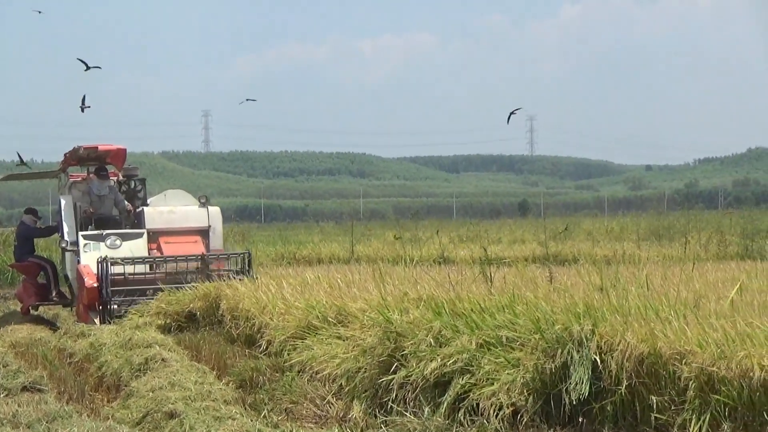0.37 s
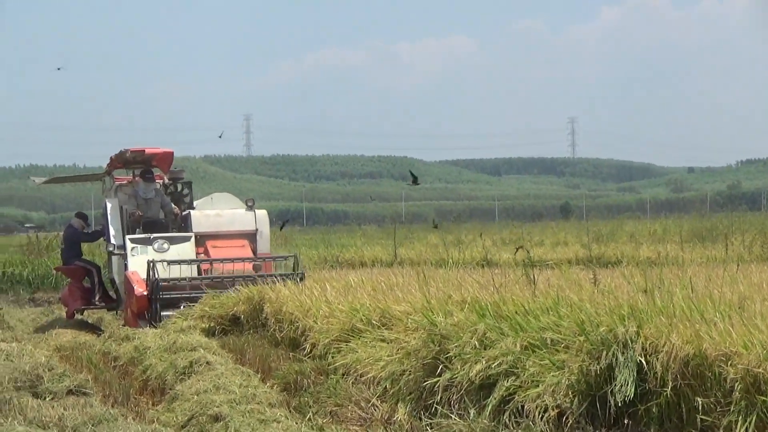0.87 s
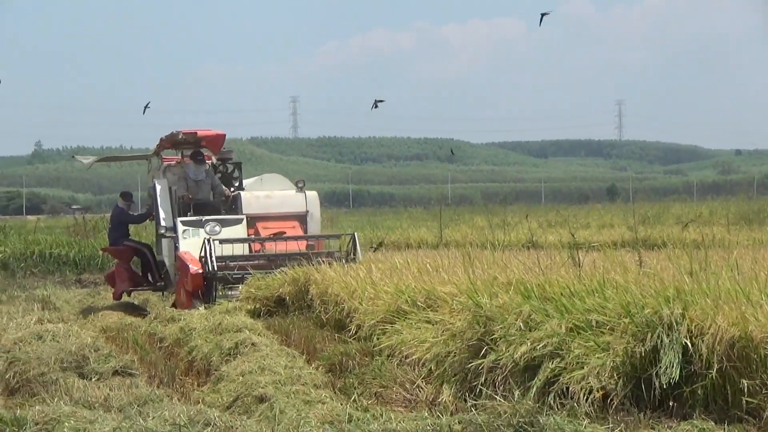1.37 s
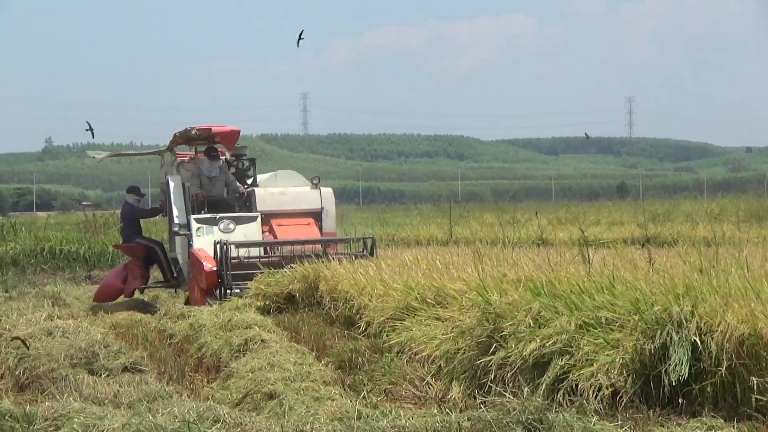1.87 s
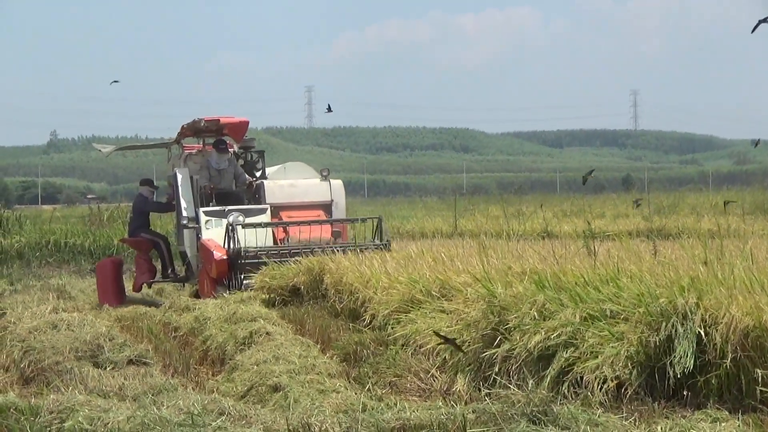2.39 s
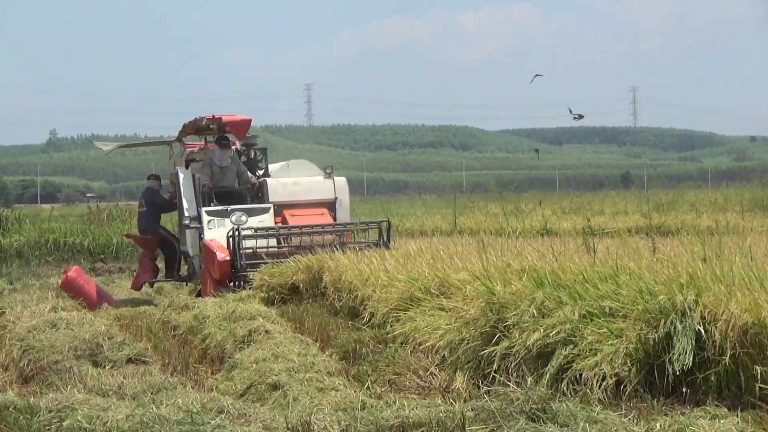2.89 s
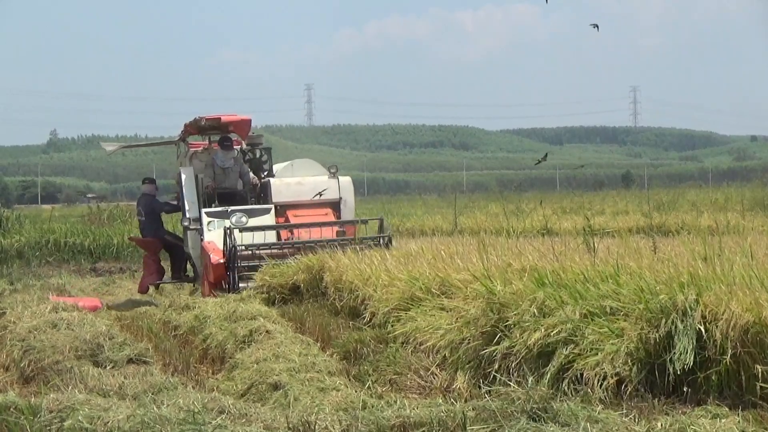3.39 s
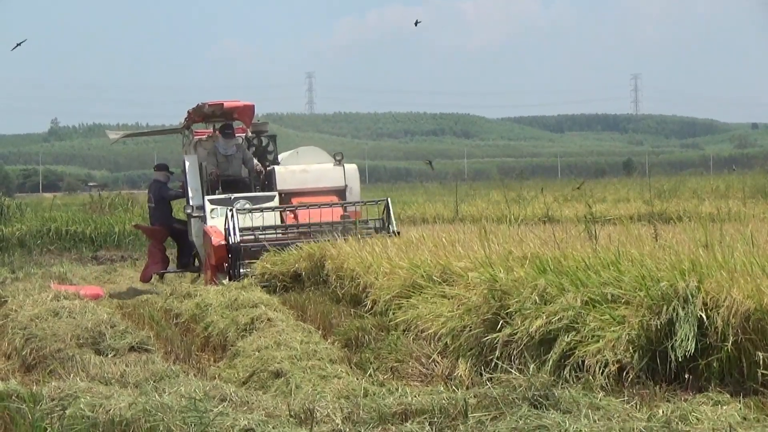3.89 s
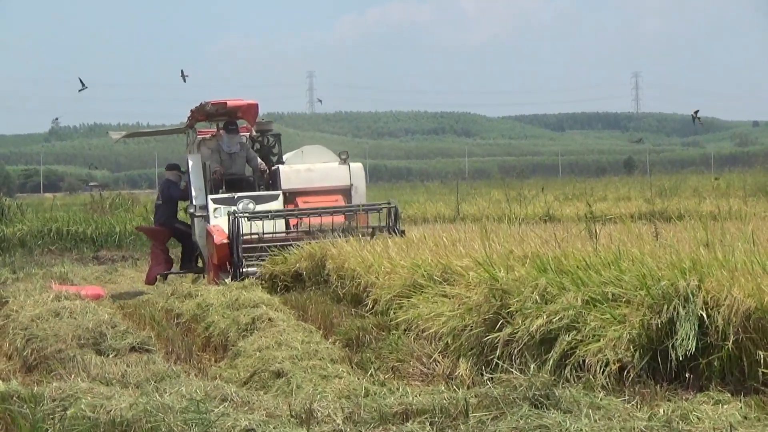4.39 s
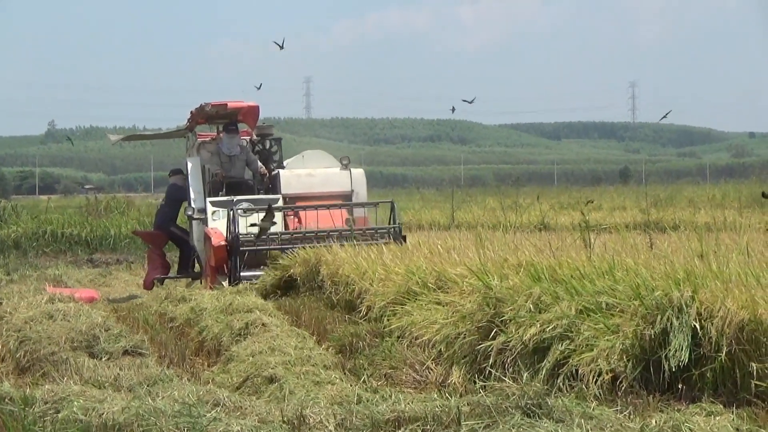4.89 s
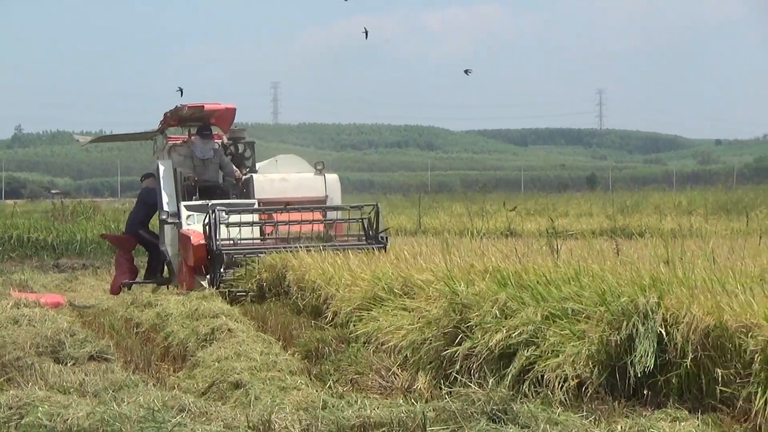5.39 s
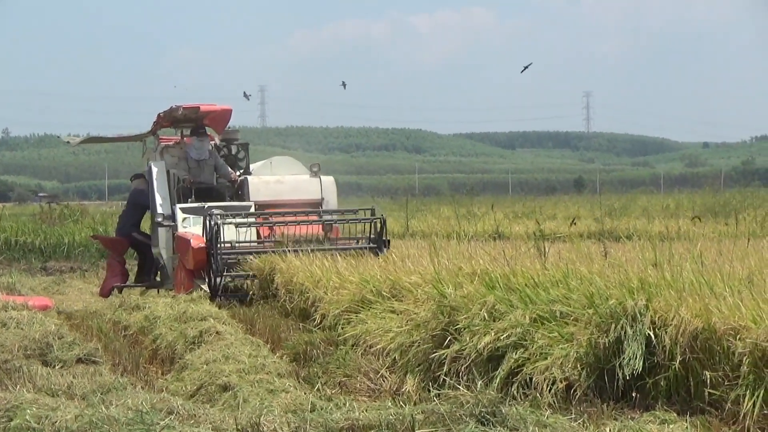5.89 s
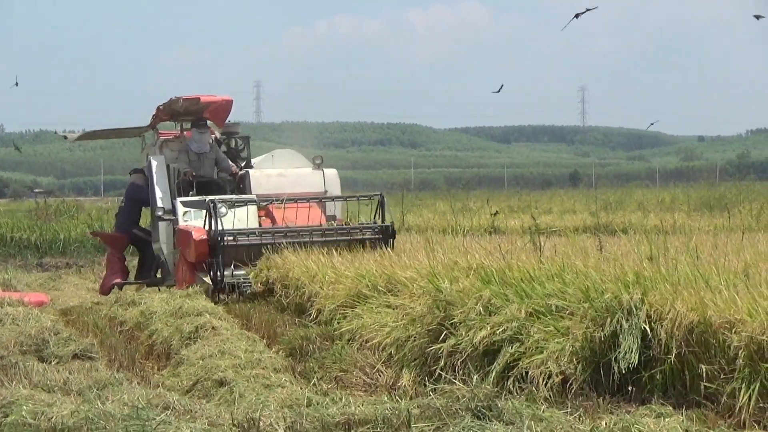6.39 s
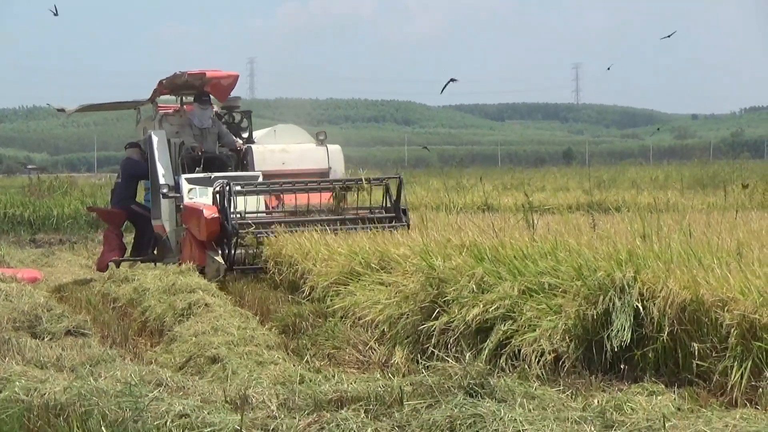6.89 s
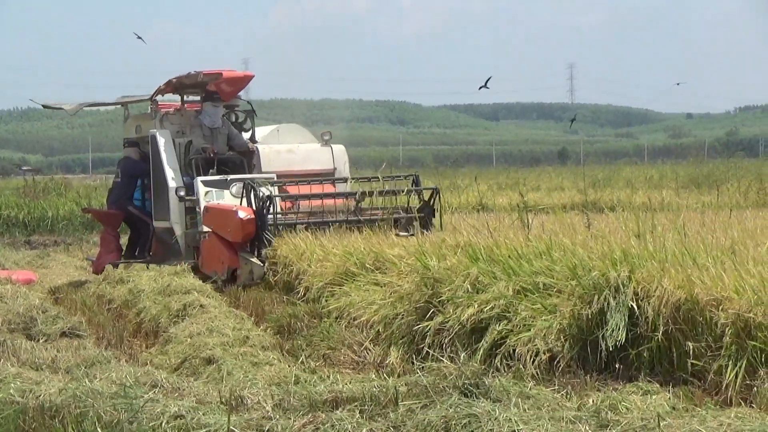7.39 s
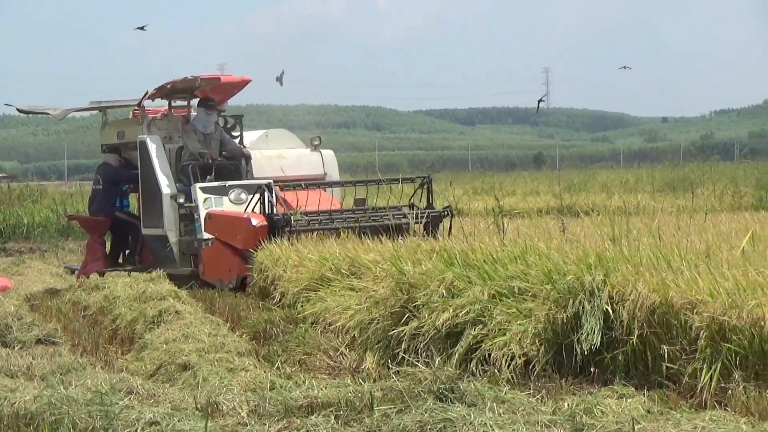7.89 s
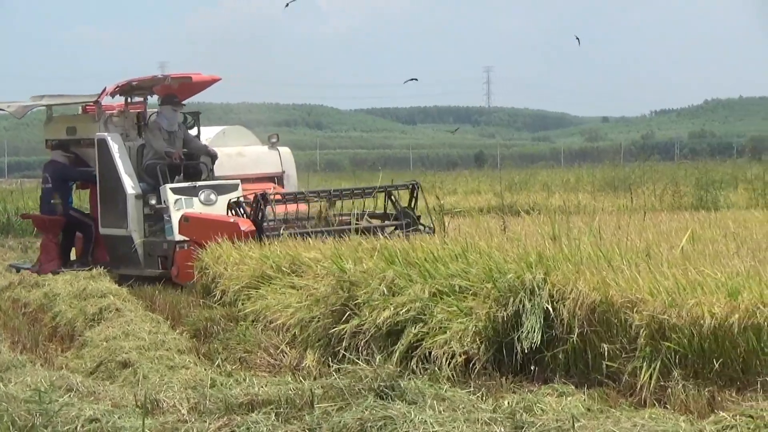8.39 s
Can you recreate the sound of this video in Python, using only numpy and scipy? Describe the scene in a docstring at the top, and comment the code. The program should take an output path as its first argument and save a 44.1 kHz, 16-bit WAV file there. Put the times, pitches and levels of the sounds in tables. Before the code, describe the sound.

Continuous outdoor harvesting noise: rattling drum and panels, rough roar, straw swishing through the cutter, and a soft low engine hum. The machine is loudest in the midrange, uneven as wads of straw pass, and gradually gains level. Brief hard knocks and muffled thuds break the texture. Low wind flutter strikes the exposed microphone lightly at first, then heavily on the right halfway through, over quiet recorder hiss.

```python
"""Combine harvester across a rice field

A combine harvester cuts rice some way off across an open field and slowly comes nearer. The engine hums in
tones on its firing rate; drum and panels clatter and the cutter bar rustles through the straw, as noise and
ringing ticks that two microphone ports colour unequally. Wind puffs hit the ports as shaped noise and short
pulses, over the recorder's hiss and a thin steady whine high in the treble."""
import sys
import numpy as np
from scipy import signal
from scipy.fft import rfft, irfft, next_fast_len
from scipy.io import wavfile
from scipy.ndimage import uniform_filter1d, map_coordinates

SR = 44100
rng = np.random.default_rng(int(sys.argv[2]) if len(sys.argv) > 2 else 0)


def amplitude_ratio(level_db):
    """Convert a level in decibels to the matching linear amplitude (field) ratio."""
    exponent = np.asarray(level_db, float) / 20
    return 10 ** exponent


def master(y):
    """Save y as 16-bit WAV."""
    cut = np.clip(np.atleast_2d(y).T, -1, 1)
    pcm = np.round(cut * 32767)  # scale
    wavfile.write(sys.argv[1], SR, pcm.astype(np.int16))


N = 375732  # length [samples]


def unit(x):
    """Scale to rms 1."""
    return x / np.sqrt(np.mean(x ** 2) + 1e-20)


def along(points, hz):
    """Read (frequency, value) points on a log frequency axis."""
    f, v = np.transpose(points)
    return np.interp(np.log(hz + 1), np.log(f + 1), v)


def curve(points):
    """Join (time, value) points into one value per sample."""
    s, v = np.transpose(points)
    return np.interp(np.arange(N) / SR, s, v)


def swells(times, half_s, *rises):
    """Sum bell-shaped rises in dB; one curve for each column of rises."""
    coarse_s = np.arange(0, N, 32) / SR
    bell = np.exp(-((coarse_s - times[:, None]) / np.reshape(half_s, (-1, 1))) ** 2)
    return [np.repeat(r @ bell, 32)[:N] for r in rises]


def wobble(rate):
    """A smooth random curve through rate knots a second."""
    knots = rng.standard_normal(int(N * rate / SR) + 4)
    return map_coordinates(knots, [np.arange(N) * rate / SR])


def filtered(x, response):
    """Shape the spectrum of x by a complex response of frequency."""
    m = next_fast_len(N + 8192)
    return irfft(rfft(x, m) * response(np.fft.rfftfreq(m, 1 / SR)), m)[..., :N]


def patchy(depth_db):
    """Two white noises that share drifting patches of gain, as turbulent air gives a far source."""
    z = signal.stft(rng.standard_normal((2, N)), nperseg=512)[2]
    field = uniform_filter1d(rng.standard_normal(z.shape[1:]), size=5, axis=0)
    field = uniform_filter1d(field, size=10, axis=1)
    return signal.istft(z * amplitude_ratio(depth_db * unit(field)), nperseg=512)[1][:, :N]


# tone of the recorder's hiss before levelling: (frequency [Hz], relative level [dB per Hz])
HISS_COLOUR = [(300, -2), (3000, -9), (9000, 0.5), (15500, 1.5)]


def recorder_hiss():
    """Faintly patchy noise in each channel, gently wavering in level."""
    noise = filtered(patchy(depth_db=1.5), lambda hz: amplitude_ratio(along(HISS_COLOUR, hz)))
    return amplitude_ratio(-42.0) * unit(noise) * amplitude_ratio(.3 * wobble(14))


# thin steady tones high in the treble: (frequency [Hz], rms level [dB])
WHINE_TONES = [(8317, -79), (11089, -74), (13861, -80)]


def high_whine():
    """Steady sines, the same in both channels."""
    t = np.arange(N) / SR
    return sum(amplitude_ratio(db) * np.sqrt(2) * np.sin(2 * np.pi * hz * t) for hz, db in WHINE_TONES)


# tone of the wind rumble before levelling: (frequency [Hz], relative level [dB per Hz])
RUMBLE_COLOUR = [(15, -24), (40, 0), (90, -3), (200, -15), (400, -20), (900, -50)]
# tone of the gust flutter before levelling: (frequency [Hz], relative level [dB per Hz])
FLUTTER_COLOUR = [(40, -18), (110, 0.5), (180, 1.5), (330, -2.5), (430, -11), (900, -42)]
# gusts on the ports: (time [s], flutter's rise over the breeze [dB], half length [s])
GUST_TIMES = [(.63, 13, .14), (1.5, 4, .2), (2.45, 4, 0.17), (3.5, 1, .3), (4.4, 22.5, 0.12),
              (4.6, 10, 0.1), (4.92, 21, .16), (5.127, 10, 0.081), (5.336, 19.5, 0.13), (6.43, 2, .3),
              (7.85, 4, .15)]


def breeze():
    """Lumpy rumble unrelated at the two ports, and one flutter in gusts, mostly on the right."""
    flutter_db, rumble_db = -58, -55.5  # in the breeze, before port shares and gusts
    rumble_grows = .5  # dB per dB of gust
    rumble = filtered(rng.standard_normal((2, N)), lambda hz: amplitude_ratio(along(RUMBLE_COLOUR, hz)))
    lumps = amplitude_ratio(6.7 * np.array([wobble(7.8), wobble(7)]))
    flutter = filtered(rng.standard_normal(N), lambda hz: amplitude_ratio(along(FLUTTER_COLOUR, hz)))
    s, rise, half = np.transpose(GUST_TIMES)
    gust_db, = swells(s, half, rise)
    flutter = unit(amplitude_ratio(3.8 * wobble(30)) * flutter)
    gusts = amplitude_ratio(flutter_db + gust_db) * flutter * np.array([[-.25], [1.6]])
    return amplitude_ratio(rumble_db + rumble_grows * gust_db) * unit(lumps * rumble) + gusts


# wind puffs: (time [s], level before a 3 dB lift and the port shares [dB], pitch [Hz],
# share on right minus share on left [-1..1])
PUFF_TIMES = [(.624, -29, 180, -0.19), (.723, -32, 170, 0.099), (.813, -38, 60, -.5), (1.496, -39, 60, -.7),
              (2.132, -38, 55, -.7), (4.368, -23, 190, .45), (4.429, -20, 220, .57), (4.502, -27, 80, 0.85),
              (4.538, -36, 75, .9), (4.602, -38, 60, 0.43), (4.791, -29, 70, .9), (4.883, -26, 169, 0.57),
              (4.939, -23.5, 80, 1), (5.028, -31, 90, .9), (5.101, -30, 150, -0.13), (5.172, -36, 80, 0.99),
              (5.304, -22, 200, 0.76), (5.312, -30, 60, 0.98), (5.4, -34, 140, 0.38), (5.483, -35, 140, .2)]


def puffs():
    """Single short pushes of air: pulses of about one cycle, opposite in sign at the two ports."""
    out = np.zeros((2, N + SR))
    t = np.arange(SR // 10) / SR - .03
    for s, db, hz, side in PUFF_TIMES:
        bell = np.exp(-(t * hz / 0.64) ** 2)
        push = bell * np.cos(2 * np.pi * hz * t + rng.uniform(0, 2 * np.pi))
        shares = [(side - 1) / 2, (side + 1) / 2]
        out[:, round((s - .03) * SR):][:, :len(t)] += np.outer(shares, amplitude_ratio(db + 3.0) * push)
    return out[:, :N]


# the machine draws nearer and its load varies: (time [s], loudness [dB])
LOUDNESS = [(0, -24.5), (.6, -25), (1.4, -24), (2, -23.5), (3, -23), (3.9, -23), (4.2, -22), (4.75, -24),
            (5.5, -21.5), (6.1, -22.5), (6.6, -21.5), (7.5, -21.5), (7.9, -21), (8.52, -21)]
MIDDLE_DB = -23  # middle loudness, also the clatter's level there


def nearness():
    """Loudness of the machine in dB over its middle."""
    return curve(LOUDNESS) - MIDDLE_DB


# engine speed: (time [s], firing rate [firings per s])
FIRING_RATE = [(0, 74.3), (.6, 74.8), (1.3, 75.4), (2.5, 75.8), (3.4, 75.5), (4.2, 75.6), (4.9, 74.5),
               (6.5, 74.4), (7.4, 73.2), (8.1, 72.4), (8.52, 73.2)]


def firings():
    """Running count of engine firings, the clock of hum and machine."""
    return np.cumsum(curve(FIRING_RATE)) / SR


def engine(turns):
    """Three wavering exhaust orders; a slightly faster second shaft makes the first two throb."""
    throb_s, in_step_s = 1.48, 0.62  # nominal throb of the first order, moment both agree
    first_db, second_db = -57, -45  # at middle loudness, before shaft and port shares
    first_grows, second_grows = .3, 1.7  # dB per dB of loudness
    near_db = nearness()
    ahead = 2 * np.pi * (np.arange(N) / SR - in_step_s) / throb_s + 0.43 * wobble(1.29)

    def tone(order, shaft):
        """One order of the engine plus the shaft's share of it."""
        phase = 2 * np.pi * order * turns + 0.15 * order * wobble(6)
        return np.sqrt(2) * (np.sin(phase) + shaft * np.sin(phase + order * ahead))

    first = amplitude_ratio(first_db + first_grows * near_db) * tone(order=1, shaft=.75)
    second_db = second_db + second_grows * near_db
    second = amplitude_ratio(second_db + 0.72 * wobble(8)) * tone(order=2, shaft=-.38)
    second = second * amplitude_ratio([[1.5], [-1.5]])  # stronger on the left
    third_db = second_db - 14.0 + .8 * near_db + 1.9 * wobble(3.62)
    return first + second + amplitude_ratio(third_db) * tone(order=3, shaft=0)


# what each port hears of the machine, ground echo dips included, before each band is levelled:
# (frequency [Hz], relative level [dB])
LEFT_COLOUR = [(60, -30.5), (190, -17), (330, -26.5), (385, -29.5), (540, -19), (1000, -22), (1100, -25.5),
               (1300, -12.5), (1500, -6), (1640, -8.5), (1830, 0.5), (1950, 0.8), (2050, 1.5), (2300, -9),
               (3100, -22), (3600, -26), (5000, -37.5), (5800, -39), (6400, -36.5), (7000, -32),
               (8600, -41.5), (11000, -67)]
RIGHT_COLOUR = [(60, -42), (190, -21), (330, -25.5), (400, -31), (540, -20), (1000, -22), (1190, -33.5),
                (1300, -17), (1500, -14.5), (1900, -15.5), (2240, -9), (2480, -9), (2620, -12),
                (2750, -12.5), (3100, -30.5), (3400, -27), (3800, -30.5), (4600, -25), (5500, -34.5),
                (6500, -32.5), (7200, -35), (8600, -41.5), (11000, -57)]
# nominal lead of the left port: (frequency [Hz], phase [radians])
LEFT_LEAD = [(300, 0), (780, .5), (1000, 0.82), (1150, 2), (1260, 0.48), (1720, 1.16), (2080, 0.15),
             (2950, 1.16), (4050, 0.5), (4900, 1.7), (5300, -1), (6000, 4.5), (6500, 4), (6900, 4),
             (8500, 5)]
# nominal likeness of the two ports: (frequency [Hz], correlation [0..1])
LIKENESS = [(100, 0.86), (390, 1), (540, 0.98), (1000, 0.96), (1180, 0.93), (1300, 1), (1800, 0.83),
            (2100, 0.98), (2800, 1), (3100, 0.63), (4500, 0.68), (5200, 0.34), (5700, .7), (6400, 0.57),
            (7100, 0.92), (8600, .4)]


def ports(pair, low_hz, high_hz):
    """One band at both ports: row one of pair is shared, row two is scattered sound that differs."""
    def heard(side, colour):
        """One port's mix of shared and scattered sound."""
        def response(hz):
            """Band edges, port colour and phase lead."""
            turn = np.arccos(np.clip(along(LIKENESS, hz), 0, 1)) / 2
            band = 1 / np.sqrt((1 + (low_hz / (hz + 1)) ** 20) * (1 + (hz / high_hz) ** 20))
            gain = band * amplitude_ratio(along(colour, hz)) * np.exp(side * .5j * along(LEFT_LEAD, hz))
            return gain * [np.cos(turn), side * np.sin(turn)]
        return filtered(pair, response).sum(axis=0)

    both = np.array([heard(1, LEFT_COLOUR), heard(-1.04, RIGHT_COLOUR)])
    return both / np.std(both.mean(axis=0))


def rattle(count, low_hz, high_hz, cycles):
    """Loose parts tick at random, each ringing a few cycles at its own pitch; most are small."""
    when, pitch, size = rng.uniform(size=(count, 3)).T
    hz = (low_hz * (high_hz / low_hz) ** pitch)[:, None]
    t = np.arange(SR // 40) / SR
    rings = amplitude_ratio(13.4 * size ** 3)[:, None] * np.sin(2 * np.pi * hz * t) * np.exp(-t * hz / cycles)
    where = (when * N).astype(int)[:, None] + np.arange(len(t))
    ticks = unit(np.bincount(where.ravel(), rings.ravel())[:N])
    return ticks * np.array([[1], [0]])  # only in the sound the ports share


# wads of straw pass through: (time [s], rise of the drum [dB], rise of the cutter [dB])
STRAW_WADS = [(.38, 2.5, -3), (.52, 2.5, .5), (.88, 4, 1), (1.0, 2.5, .5), (1.28, 3, 3), (1.56, 4, .5),
              (1.68, 2.5, 0), (1.85, 2.5, 2.5), (1.99, 3.5, -1.5), (2.11, 3.5, 0.5), (2.25, 0.5, -1),
              (2.31, 2.5, 0), (2.4, 3, .5), (2.63, 3, .5), (2.8, 3, 1), (3.18, 2.5, 2.5), (3.34, -0.5, 2),
              (3.44, 1.5, 0), (4.06, 2, .5), (4.28, -0.5, 4.5), (5.2, 4, 0), (5.29, 2, .5),
              (5.74, -0.5, 1.5), (6.27, 1.5, 1.5), (6.42, 2.5, 1), (6.81, 3, 3.5), (7.17, 6, 4.5),
              (7.12, 0, -2), (7.76, 5, 2.5), (7.83, 2.5, 0), (7.99, 0.5, 1.5), (8.16, 2.5, 0.5)]


def machine(turns):
    """Roar, clatter and rustle: dense noise and rattles shaken in shared and separate bursts."""
    roar_db, rustle_db = -36.5, -38.5  # at middle loudness
    roar_grows, rustle_grows = 1, 0.55  # dB per dB of loudness
    near_db = nearness()
    s, drum, cutter = np.transpose(STRAW_WADS)
    drum_db, cutter_db = swells(s, .025, drum, cutter)  # half length of a wad [s]
    feed = wobble(12)  # the flow of straw is never even
    clatter_db = MIDDLE_DB + near_db + drum_db + 0.66 * feed + 0.5 * wobble(20)
    roar_db = roar_db + roar_grows * near_db + 0.13 * drum_db + 0.34 * feed
    rustle_db = rustle_db + rustle_grows * near_db + cutter_db + 0.5 * feed + 1.0 * wobble(5)

    shake = 0.7 * wobble(35) + 0.74 * wobble(90)  # uneven feed of straw jolts the whole machine
    firing = 1 + 0.024 * np.cos(2 * np.pi * turns)  # every firing kicks the panels
    stroke = 1 + 0.089 * np.cos(2 * np.pi * turns / 3)  # the knife strokes once in three firings
    panels = amplitude_ratio(-19.5) * rattle(count=1500, low_hz=1252, high_hz=2871, cycles=13.5)
    straw = amplitude_ratio(-16.5) * rattle(count=1500, low_hz=2925, high_hz=7940, cycles=8.1)

    roar = patchy(depth_db=0.6) * amplitude_ratio(1.2 * shake) * firing
    drum_noise = patchy(depth_db=-0.15) * amplitude_ratio(0.85 * shake + 0.89 * wobble(200))
    clatter = (drum_noise + panels) * firing
    cutter_noise = patchy(depth_db=1.2) * amplitude_ratio(0.97 * shake + 0.39 * wobble(14))
    rustle = (cutter_noise + straw) * stroke
    return (amplitude_ratio(roar_db) * ports(roar, 34, 1220)
            + amplitude_ratio(clatter_db) * ports(clatter, 993, 3100)
            + amplitude_ratio(rustle_db) * ports(rustle, 2938, 12000))


def blows(events, attack, t60, balance_db):
    """Each blow rings a panel for a moment, the left port leading as for the rest of the machine."""
    t = np.arange(SR // 10) / SR
    shape = (1 - np.exp(-t / attack)) * amplitude_ratio(-60 * t / t60)
    shape = shape * amplitude_ratio([[balance_db / 2], [-balance_db / 2]])  # louder on the left
    out = np.zeros((2, N + len(t)))
    for s, db, hz in events:
        lead = along(LEFT_LEAD, hz) / 2 * np.array([[1], [-1]])
        out[:, round(s * SR):][:, :len(t)] += amplitude_ratio(db) * shape * np.sin(2 * np.pi * hz * t + lead)
    return out[:, :N]


# single hard knocks in the drum: (time [s], level before envelope and balance [dB], ring [Hz])
DRUM_KNOCKS = [(0.3755, -6, 1840), (0.5232, -9, 2030), (1.2775, -6, 2060), (1.6726, 1, 1980),
               (2.152, -5, 1990), (3.3363, -4, 1880), (6.3639, -4, 2110), (6.4083, -4, 1960),
               (7.1566, -1.5, 2110), (7.451, -2.5, 1994), (7.7608, -6, 2103), (8.0257, -4.5, 1930),
               (8.1663, -9, 1990), (8.4277, -4, 2000)]
# dull thuds of the machine's body: (time [s], level before envelope and balance [dB], ring [Hz])
BODY_THUDS = [(1.006, -31, 581), (1.62, -33, 760), (1.674, -24, 659), (1.875, -25, 568), (2.216, -41, 695),
              (2.766, -30, 673), (4.478, -29, 502), (5.599, -39, 493), (5.682, -23.5, 530),
              (6.65, -30, 606), (6.795, -22, 528), (7.256, -26, 774), (7.35, -31, 646), (7.541, -33, 535),
              (8.334, -27, 630), (8.487, -26, 575)]


def knocks():
    """Bright, short knocks in the drum and dull, longer thuds in the body."""
    bright = blows(DRUM_KNOCKS, attack=0.002, t60=0.021, balance_db=10.5)
    dull = blows(BODY_THUDS, attack=0.0019, t60=0.07, balance_db=.6)
    return bright + dull


def scene():
    """Wind and machine at the microphone."""
    turns = firings()
    return breeze() + puffs() + engine(turns) + machine(turns) + knocks()


def roll_off(x):
    """The treble ends steeply here."""
    return signal.sosfilt(signal.butter(12, 16340, fs=SR, output="sos"), x)


def record(dry):
    """Round off peaks, add the recorder's hiss and a thin high whine, keep nothing above the band limit."""
    ceiling, knee, top_hz = .95, 6, 15480  # full scale = 1, sharpness of rounding, band limit [Hz]
    rounded = dry / (1 + np.abs(dry / ceiling) ** knee) ** (1 / knee)
    mix = filtered(rounded + recorder_hiss() + high_whine(), lambda hz: hz < top_hz)
    return roll_off(mix)


dry = scene()
out = record(dry)
master(out)
```